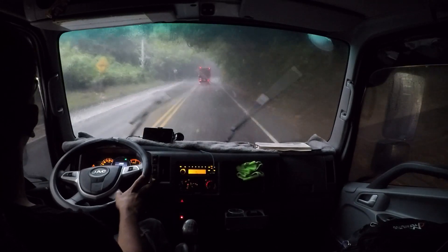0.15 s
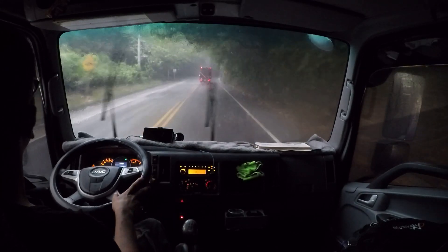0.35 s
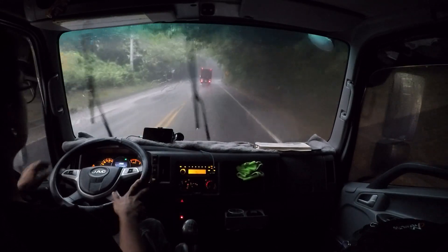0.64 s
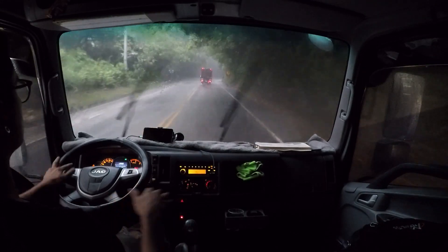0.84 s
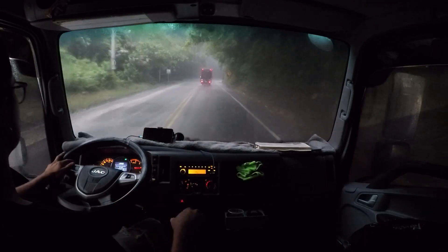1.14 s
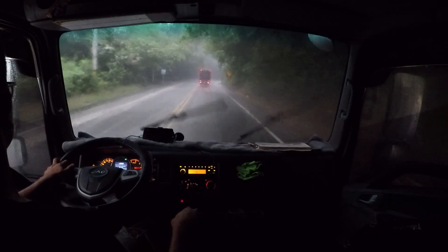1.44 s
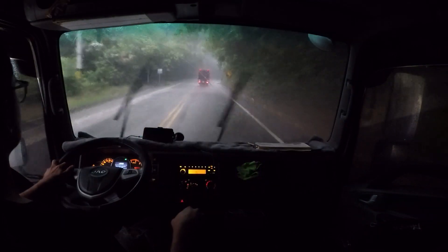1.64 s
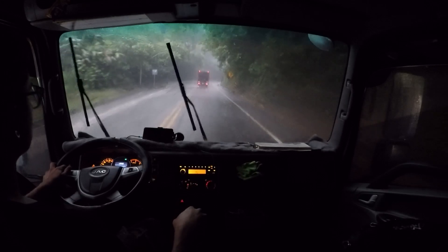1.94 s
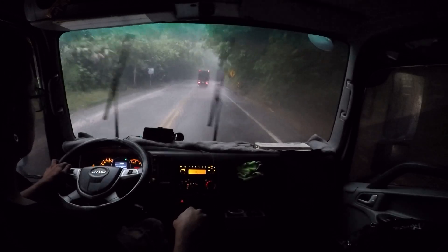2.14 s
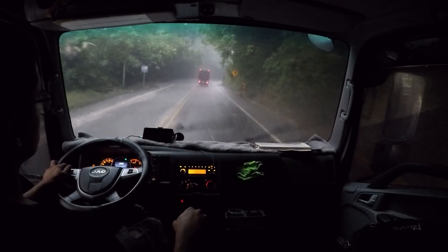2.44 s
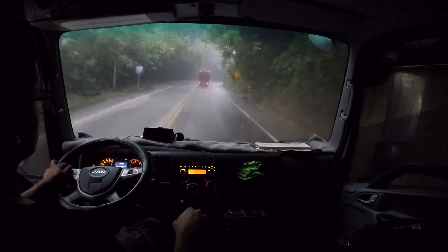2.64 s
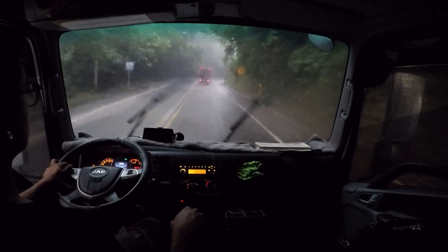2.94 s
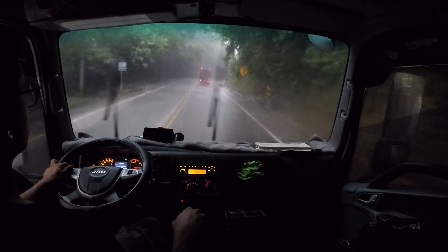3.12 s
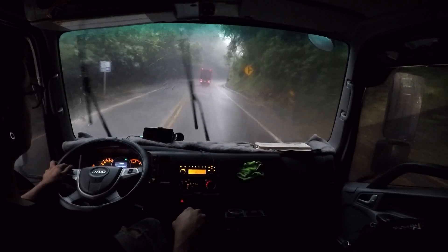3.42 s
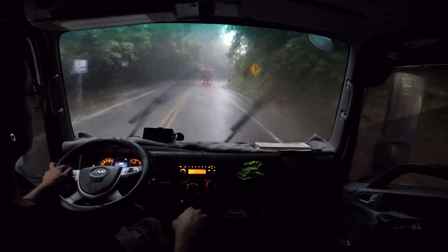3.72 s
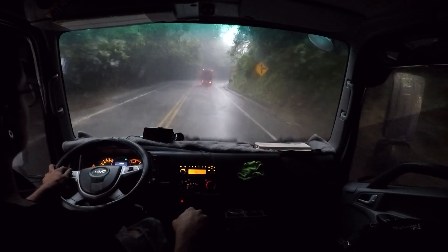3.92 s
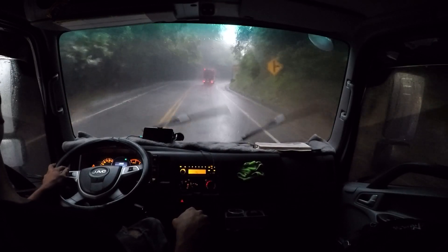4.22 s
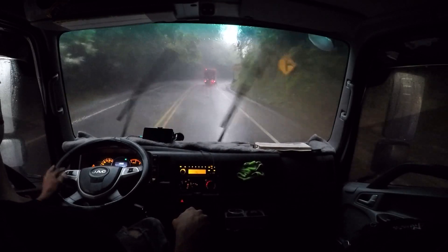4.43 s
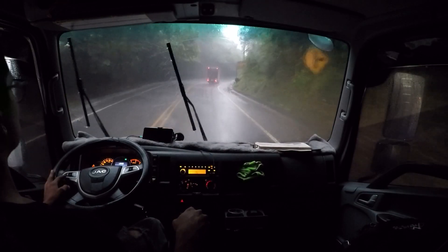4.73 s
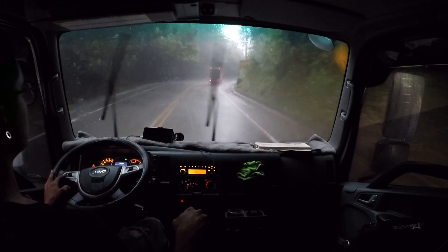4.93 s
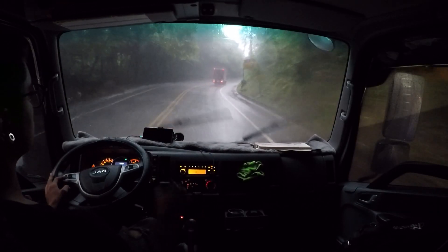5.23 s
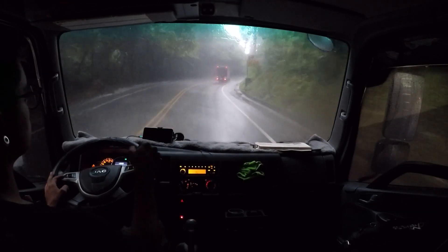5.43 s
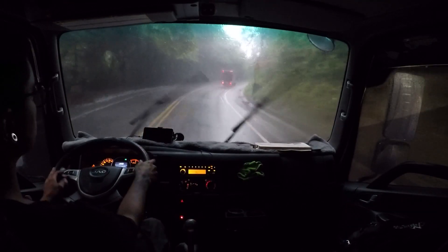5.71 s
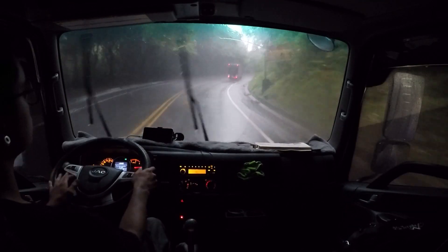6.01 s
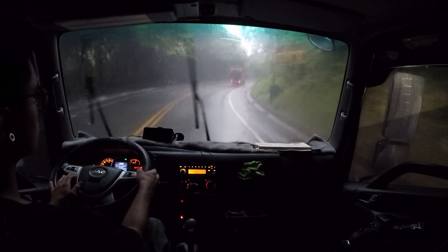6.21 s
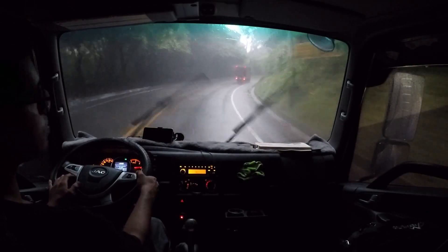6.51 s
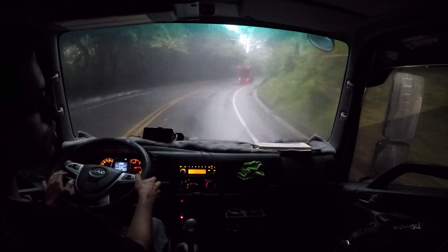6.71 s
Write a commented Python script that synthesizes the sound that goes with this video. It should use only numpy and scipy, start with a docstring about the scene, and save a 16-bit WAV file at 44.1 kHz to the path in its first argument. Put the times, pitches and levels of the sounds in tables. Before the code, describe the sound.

Steady low diesel engine drone fills a moving cab, with hissing wet tyres, dull suspension thumps, faint whine and occasional plastic ticks and squeaks.

```python
"""Inside the cab of a four-cylinder diesel truck that slowly gathers speed on a wet road.
Tyres roar and hiss (filtered noise with single drops), while the road shakes the cab and rings its floor.
Loose trim rattles and squeaks in short bursts of noise. Sines make the faint turbo and gear whine.
In front of it all drones the engine: sines at multiples of the firing rate, plus a noisy knock."""
import sys
import numpy as np
from scipy import signal
from scipy.fft import rfft, irfft, next_fast_len
from scipy.io import wavfile
from scipy.ndimage import uniform_filter1d, minimum_filter1d

SR = 44100
rng = np.random.default_rng(int(sys.argv[2]) if len(sys.argv) > 2 else 0)


def generate_wav(signal):
    """Clip the signal to [-1, 1] and save it as 16-bit WAV at the path in sys.argv[1]."""
    frames = np.transpose(np.atleast_2d(signal))
    scaled = np.clip(frames, -1, 1) * 32767
    pcm = np.round(scaled).astype(np.int16)
    wavfile.write(sys.argv[1], SR, pcm)


N = 302526
TIME = np.arange(N) / SR  # s

# How rough the road is; it turns smoother halfway: t/s, coarseness/dB
ROAD_COARSENESS = [(0, 0.5), (2.1, -0.04), (2.9, 1.5), (3.4, -2.5), (4.3, -3.5), (6.86, -3.5)]
# Broken, puddled patches: middle t/s, length/s, rise of tyre roar/dB, rise of cab boom/dB
ROAD_PATCHES = [(0.088, 0.11, 1.5, 5.5), (0.312, 0.048, 2, 2.5), (0.56, 0.049, 2, 0), (0.806, 0.22, 2.5, 0),
                (1.465, 0.11, 0.5, 3), (2.26, 0.058, 1.5, 6.5), (2.815, 0.3, 1, -2), (3.702, 0.31, 3, 1),
                (3.918, 0.1, 3, 2), (4.562, 0.12, 2, 1), (4.83, 0.072, 3.5, 3), (5.542, .16, 3.5, 2),
                (5.956, 0.32, 1.5, 5), (6.136, .1, 0.5, 0.5), (6.68, .14, 2, 0)]
# Dips that rock the engine on its mounts: middle t/s, length/s, level/dB
ROAD_DIPS = [(.18, .28, -17.5), (0.606, 0.16, -19), (0.865, 0.23, -18.5), (1.107, 0.2, -14),
             (1.495, 0.13, -15.5), (1.85, 0.34, -17), (3.022, 0.13, -19), (3.544, 0.093, -26),
             (5.3, 0.4, -32), (5.96, 0.18, -10.5), (6.605, 0.26, -26.5)]
# Suspension knocks that ring the floor: middle t/s, length/s, level before mixing/dB
SUSPENSION_KNOCKS = [(0.304, 0.16, -42), (0.607, 0.17, -43), (.9, 0.14, -40), (1.195, 0.21, -42),
                     (2.227, .14, -44), (2.848, 0.2, -41.5), (4.79, 0.072, -46.5), (5.597, .1, -43),
                     (5.84, 0.19, -42), (6.072, .16, -45.5), (6.623, 0.22, -44)]
# Engine speed: t/s, firing rate f/Hz
FIRING_RATE = [(0, 62.32), (1.85, 65.49), (3.9, 67.81), (5.65, 67.95), (6.86, 67.49)]
# One resonance of the cab air per firing harmonic: f/Hz, width/Hz, level at the centre/dB
AIR_MODES = [(68.27, 11, -11), (124.96, 18.75, -18.5), (198.75, 8.44, -19), (258.3, 10.66, -28.5)]
# Each firing harmonic at the two microphones: left minus right level/dB, left lead/rad
DRONE_STEREO = [(-2, -0.76), (-0.4, 0.6), (-2, -0.45), (-10, -0.42)]
# Swells of the turbo whistle: middle t/s, length/s, f at the middle/Hz, glide/(Hz per s), level/dB
TURBO_SWELLS = [(0.684, .6, 2064, 21, -50), (5.15, 1, 2086, -49.5, -54)]
# Loudest rattles of loose trim: t/s, level before mixing/dB
RATTLES = [(1.171, -28.5), (1.286, -28), (1.317, -29), (1.449, -29), (1.958, -30.5), (2.6423, -29),
           (2.783, -28), (2.898, -29), (4.809, -30), (5.471, -30), (6.097, -33)]
# Bouts of squeaks: t/s, number of chirps, level before mixing/dB, centre f/Hz
SQUEAK_BOUTS = [(1.4294, 1, -31, 6300), (1.6708, 2, -32, 6650), (1.812, 1, -32, 7000),
                (3.3268, 4, -34.5, 5970), (3.7985, 1, -33, 6100), (4.0352, 1, -35, 6200),
                (5.217, 1, -36, 6430), (5.5363, 3, -34, 6100), (6.3956, 1, -36, 6110),
                (6.6348, 1, -36, 6050)]

# Tone colours of the noises: f/Hz, relative level/dB
SHAKE_COLOUR = [(12, -17), (18, -8), (27, -4.5), (42, -1.5), (52, -2), (62, -4.5), (75, -5), (100, -12.5),
                (140, -27)]  # low shaking of the cab
BOOM_COLOUR = [(85, -33), (112, -7), (128, -10), (158, -5), (177, 1), (195, -5), (230, -13.5), (260, -15.5),
               (300, -24), (370, -28), (480, -36.5), (700, -56)]  # air set booming by the cab panels
FLOOR_COLOUR = [(260, -10), (320, 2.5), (390, -0.5), (460, -10.5), (600, -17)]  # hollow ring of the floor
ROAR_COLOUR = [(220, -19), (330, 2), (400, -1.5), (500, -3.5), (620, -7), (900, -2.5), (1200, 0),
               (1500, -4), (1900, -6), (2300, -8), (2800, -18)]  # tyre tread on the road
SPRAY_COLOUR = [(1700, -1), (2600, -2.5), (3100, -3), (4000, -2), (5300, -4), (6100, 0.5), (7400, 2),
                (8100, -4), (9000, -8.5), (10200, -12), (11500, -22.5), (13000, -20), (14400, -42)]  # water thrown up by the tyres
KNOCK_COLOUR = [(400, -16), (700, -5.5), (1200, 3), (1600, 1), (2200, -10), (3300, -11.5), (5000, -31)]  # combustion ringing the engine block

# How wide the cab sounds: f/Hz, side minus mid level/dB
CAB_WIDTH = [(370, -6), (550, -2), (760, 8.5), (1000, -3.5), (1240, 7.5), (1600, 7.5), (2260, 6.5),
             (3200, -7), (4140, -7), (5500, -3), (7600, 1)]
# Resonances of dashboard, engine cover and glass: f/Hz, width/Hz, left level/dB, right level/dB
PANEL_RESONANCES = [(704, 178, 9, 3.5), (790, 100, 1.5, 7.5), (1100, 110, -1.5, 2), (1230, 210, 3.5, -1.5),
                    (1377, 106, 6, 5.5), (1662, 266, 6.5, 2), (2100, 81, 3.5, -3.5), (2284, 360, 3.5, 5.5),
                    (3120, 235, 0, 6), (3470, 220, 3.5, 6), (4900, 600, -0.5, -3.5)]


def undb(db):
    """Turn decibels into a plain gain."""
    return 10 ** (np.asarray(db) / 20)


def unit(x):
    """Scale to an rms (average strength) of 1."""
    return x / np.sqrt(np.mean(x ** 2))


def curves(table):
    """Join the points of each table column with straight lines, one value per sample."""
    times, *columns = np.transpose(table)
    return [np.interp(TIME, times, column) for column in columns]


def swell(middle_s, length_s):
    """Rise smoothly to 1 and fall back; the length is the time spent above half."""
    return np.cos(np.pi / 2 * np.clip((TIME - middle_s) / length_s, -1, 1)) ** 2


def walk(rate_hz):
    """Wander at random with an rms of 1, about this many new targets a second."""
    step = int(SR / rate_hz)
    stairs = np.repeat(rng.standard_normal(N // step + 1), step)
    return unit(uniform_filter1d(stairs, step)[:N])


def noise():
    """Make two unrelated white noises: one for the middle, one for the sides."""
    return rng.standard_normal((2, N))


def colour(x, points):
    """Filter a sound so that its tone follows the given points of Hz and dB."""
    hz, db = np.transpose(points)
    size = next_fast_len(N + 8192)
    bins = np.maximum(np.fft.rfftfreq(size, 1 / SR), 1)
    gain = undb(np.interp(np.log(bins), np.log(np.maximum(hz, 1)), db))
    return irfft(rfft(x, size) * gain, size)[..., :N]


def band(x, points):
    """Colour a sound, let both ends fall away within an octave, and set its rms to 1."""
    below, above = (points[0][0] / 2, -100), (points[-1][0] * 2, -100)
    return unit(colour(x, [below, *points, above]))


def resonance(hz, centre_hz, width_hz):
    """Answer most strongly, with gain 1, at the centre and steeply less away from it."""
    return 1 / (1 + (2 * (hz - centre_hz) / width_hz) ** 2)


def tone(phase, pan_db, lead):
    """Make a sine that reaches two microphones with different strength and phase (lead in rad)."""
    left = undb(pan_db / 2) * np.sin(phase + lead / 2)
    right = undb(-pan_db / 2) * np.sin(phase - lead / 2)
    return np.sqrt(2) * np.array([left, right])


def bursts(events, octaves, rise_s, decay_s):
    """Place short noise bursts (s, dB, Hz), each ringing in a band around its own centre."""
    size = 4096
    age = np.arange(size) / SR
    envelope = (1 - np.exp(-age / rise_s)) * np.exp(-age / decay_s)
    out = np.zeros((2, N + size))
    for time_s, level_db, hz in events:
        edges = np.clip(hz * 2 ** (np.array([-0.5, 0.5]) * octaves), 100, SR / 5)
        bandpass = signal.butter(3, edges, "bandpass", fs=SR, output="sos")
        ring = signal.sosfilt(bandpass, rng.standard_normal((2, size)))
        start = int(time_s * SR)
        out[:, start:start + size] += undb(level_db) * envelope * unit(ring)
    return out[:, :N]


def cab(pair):
    """Spread mid and side to left and right; panel resonances colour each microphone differently."""
    mid, side = pair[0], colour(pair[1], CAB_WIDTH)
    hz = np.geomspace(300, 7000, 400)
    # take away the power that the wider sides would add
    side_gain = undb(np.interp(hz, *np.transpose(CAB_WIDTH)))
    spread_db = 10 * np.log10(1 + side_gain ** 2)
    panels_db = 0
    for centre, width, left_db, right_db in PANEL_RESONANCES:
        panels_db = panels_db + np.outer([left_db, right_db], resonance(hz, centre, width))
    left = colour(mid + side, np.column_stack([hz, panels_db[0] - spread_db]))
    right = colour(mid - side, np.column_stack([hz, panels_db[1] - spread_db]))
    return np.array([left, right])


def floor_pan(level_db=-0.5, apart=0.55):
    """The floor answers each knock of the suspension with a dull, hollow ring."""
    strength = 0
    for middle_s, length_s, db in SUSPENSION_KNOCKS:
        strength = strength + undb(db + level_db) * swell(middle_s, length_s)
    mid, side = strength * band(noise(), FLOOR_COLOUR)
    return np.array([mid + apart * side, mid - apart * side])


def tyres(roar_db, spray_db, tread_db=-5, water_db=-1, drops_per_s=1500, drop_spread_db=3.0,
          drop_share=0.56, flicker_db=0.88):
    """Tyre tread roars on the road, and spray hisses as single drops hit the bodywork."""
    roar = band(noise(), ROAR_COLOUR) * undb(roar_db + tread_db + flicker_db * walk(18))
    # drops are lone clicks at random moments; most are small, a few much stronger
    hits = rng.random((2, N)) < drops_per_s / SR
    signs = rng.choice([-1, 1], (2, N))
    sizes = undb(drop_spread_db * np.minimum(rng.exponential(size=(2, N)), 5))
    drops = unit(hits * signs * sizes)
    hiss = band(noise() + drop_share * drops, SPRAY_COLOUR)
    return roar + hiss * undb(spray_db + water_db + flicker_db * walk(30))


def trim(road_db, rattle_db=-1.0, body_db=-9, squeak_db=2, tick_db=-42, tick_spread_db=0.5,
         tick_octaves=0.22, count=40):
    """Plastic parts tap or rub with a chirp; small ticks come at random, louder on coarse road."""
    rattle_hz, body_hz, chirps_per_s = 4240, 1720, 12.8
    taps = bursts([(s, db, rattle_hz) for s, db in RATTLES], octaves=1.77, rise_s=0.0016, decay_s=0.0073)
    # each tap also has a deeper, slower body
    body = bursts([(s, db, body_hz) for s, db in RATTLES], octaves=1.2, rise_s=0.0066, decay_s=0.012)

    moments = rng.integers(0, N, count)
    chance = rng.uniform(-0.79, 1, (count, 2))
    small = []
    for i, (loudness, pitch) in zip(moments, chance):
        level_db = tick_db + road_db[i] + tick_spread_db * loudness
        small.append((i / SR, level_db, rattle_hz * 2 ** (tick_octaves * pitch)))
    ticks = bursts(small, octaves=1.0, rise_s=0.001, decay_s=0.0087)

    chirps = []
    for start_s, number, db, hz in SQUEAK_BOUTS:
        for k in range(round(number)):
            chirps.append((start_s + k / chirps_per_s, db, hz))
    squeaks = bursts(chirps, octaves=0.17, rise_s=0.0065, decay_s=0.01)
    return undb(rattle_db) * taps + undb(body_db) * body + ticks + undb(squeak_db) * squeaks


def rumble(turns, road_db, sway, thud_db, crank_db=-28.0, shake_db=-22.0, sway_shake_db=-17,
           boom_db=-26, road_slope=1.13, pan_db=-6.0, apart=0.25):
    """The unbalanced crank and the road rock the cab; its panels make the air boom."""
    coarse = undb(road_slope * road_db)
    crank = tone(2 * np.pi * turns + 0.2 * walk(9), -1.7, -0.14)
    rocking = (undb(crank_db) * coarse + sway) * crank
    shake_gain = undb(shake_db) * coarse + undb(sway_shake_db) * sway
    shake = shake_gain * band(noise(), SHAKE_COLOUR)
    boom = undb(boom_db + thud_db) * coarse * band(noise(), BOOM_COLOUR)
    mid, side = shake + boom
    left = undb(pan_db / 2) * (mid + apart * side)
    right = undb(-pan_db / 2) * (mid - apart * side)
    return rocking + np.array([left, right])


def turbo(drift_hz=7):
    """The turbocharger spins free of the crank and whistles faintly now and then."""
    out = 0
    for middle_s, length_s, hz, glide, db in TURBO_SWELLS:
        pitch_hz = hz + glide * (TIME - middle_s) + drift_hz * walk(25)
        whistle = tone(2 * np.pi * np.cumsum(pitch_hz) / SR, 1, 2.0)
        out = out + swell(middle_s, length_s) * undb(db) * whistle
    return out


def whine(turns, firing_hz, waver_db=0.9, backlash=0.53, mesh_db=-45, housing_hz=978,
          housing_width_hz=74, cover_db=-43.0, cover_hz=1213, cover_width_hz=34):
    """Gear teeth ring their housing; higher multiples of the crank speed ring a cover (backlash in rad)."""
    teeth, orders = 30, (36, 38, 40)  # cycles per turn of the crank
    crank_hz = firing_hz / 2
    housing = resonance(teeth * crank_hz, housing_hz, housing_width_hz)
    mesh_gain = housing * undb(mesh_db + waver_db * walk(20))
    mesh = mesh_gain * tone(2 * np.pi * teeth * turns + backlash * walk(30), -0.94, 1.0)
    cover = 0
    for order in orders:
        response = 1 / np.hypot(1, 2 * (order * crank_hz - cover_hz) / cover_width_hz)
        gain = response * undb(cover_db + waver_db * walk(15))
        cover = cover + gain * tone(2 * np.pi * order * turns + backlash * walk(30), 6.2, -3.5)
    return mesh + cover


def knock(turns, decay=0.77, scatter_db=3.0, loose=0.39):
    """Each cylinder rings the block in its own way, so the clatter repeats every two turns."""
    size = 2048
    cycle = rng.standard_normal((2, size))
    ring = cycle[:, (turns / 2 % 1 * size).astype(int)]
    firing = 2 * turns
    # every firing has its own strength and fades; decay is in firing periods
    strength = undb(scatter_db * rng.standard_normal(1000))[firing.astype(int)]
    fade = np.exp(-(firing % 1) / decay)
    return band((ring + loose * noise()) * strength * fade, KNOCK_COLOUR)


def harmonic_levels(firing_hz, sway, sway_loss_db=24):
    """Each firing harmonic swells near its cab resonance; the lowest gives way as the engine rocks."""
    levels_db = []
    for k, (hz, width, db) in enumerate(AIR_MODES, 1):
        levels_db.append(db + 20 * np.log10(resonance(k * firing_hz, hz, width)))
    levels_db[0] = levels_db[0] - sway_loss_db * sway
    return levels_db


def drone(turns, levels_db, flutter_db=0.63):
    """Firings, two per turn of the crank, push the cab air in a steady row of harmonics."""
    out = 0
    for k, (db, (pan_db, lead)) in enumerate(zip(levels_db, DRONE_STEREO), 1):
        # one shared phase offset lines the harmonics up into a lopsided pulse per firing
        phase = 2 * np.pi * 2 * k * turns + np.pi / 4
        out = out + undb(db + flutter_db * walk(12)) * tone(phase, pan_db, lead)
    return out


def scene(knock_db=-10, tyre_db=-33.0, wet_db=-39.5, splash_share=0.52):
    """Mix road, trim and engine as heard between the seats."""
    firing_hz, = curves(FIRING_RATE)
    road_db, = curves(ROAD_COARSENESS)
    turns = np.cumsum(firing_hz / 2) / SR  # crank turns so far
    sway = sum(undb(db) * swell(s, length) for s, length, db in ROAD_DIPS)
    splash_db, thud_db = sum(np.outer(rises_db, swell(s, length)) for s, length, *rises_db in ROAD_PATCHES)
    roar_db = tyre_db + road_db + splash_db
    spray_db = wet_db + road_db + splash_share * splash_db
    # the knock follows the level of the tyre roar
    clatter = undb(roar_db + knock_db) * knock(turns)
    diffuse = tyres(roar_db, spray_db) + trim(road_db) + clatter
    low = floor_pan() + rumble(turns, road_db, sway, thud_db)
    engine = turbo() + whine(turns, firing_hz) + drone(turns, harmonic_levels(firing_hz, sway))
    return cab(diffuse) + low + engine


def record(dry, ceiling_db=-2.5):
    """A limiter eases down the highest peaks; the top is cut and both ends are softened."""
    hold, edge_s, top_hz = SR // 50, 0.005, 14500  # hold in samples
    needed = np.minimum(1, undb(ceiling_db) / (np.abs(dry).max(axis=0) + 1e-9))
    gain = uniform_filter1d(minimum_filter1d(needed, hold), hold)
    lowpass = signal.ellip(8, 0.2, 70, top_hz, fs=SR, output="sos")
    from_edge_s = np.minimum(TIME, TIME[::-1])
    ends = np.sin(np.pi / 2 * np.minimum(1, from_edge_s / edge_s)) ** 2
    return ends * signal.sosfilt(lowpass, gain * dry)


dry = scene()
out = record(dry)
generate_wav(out)
```